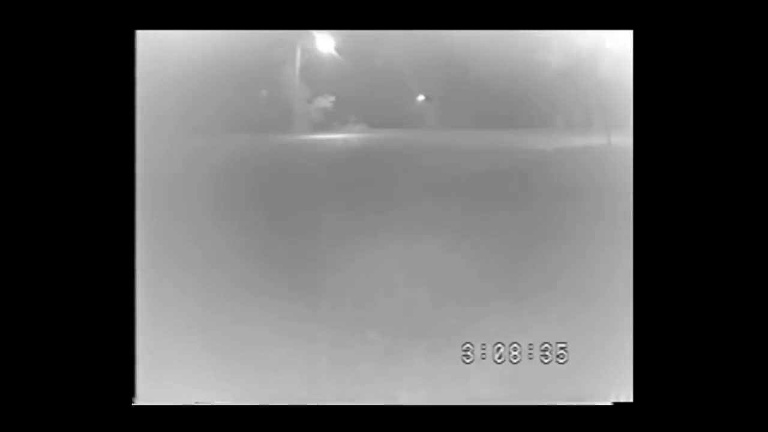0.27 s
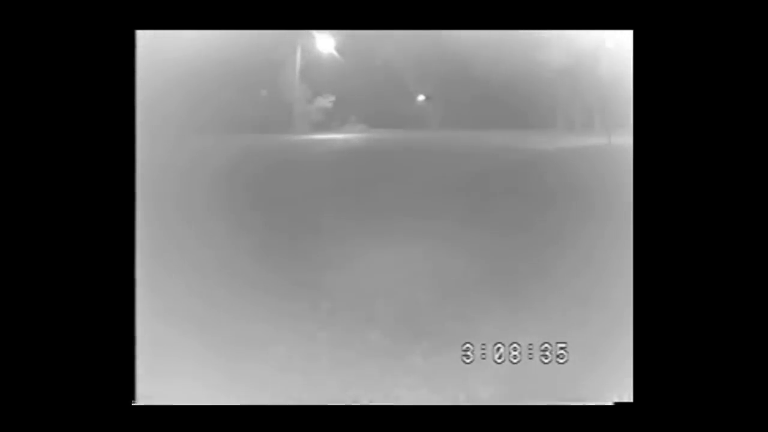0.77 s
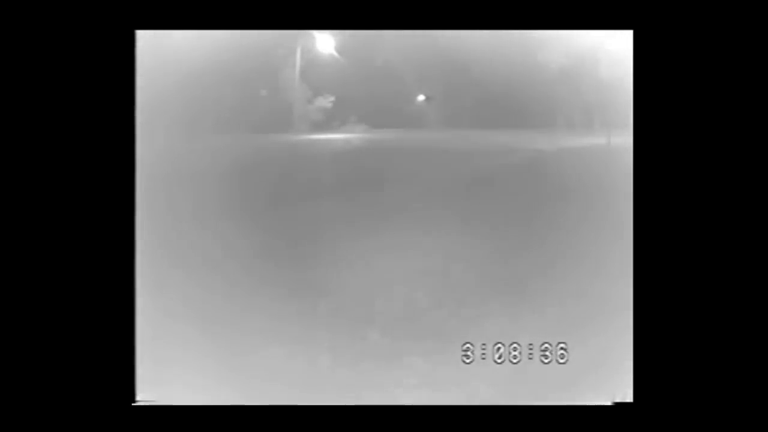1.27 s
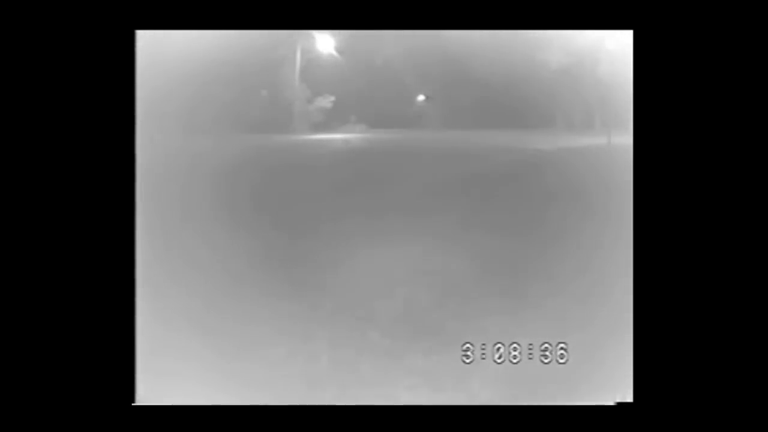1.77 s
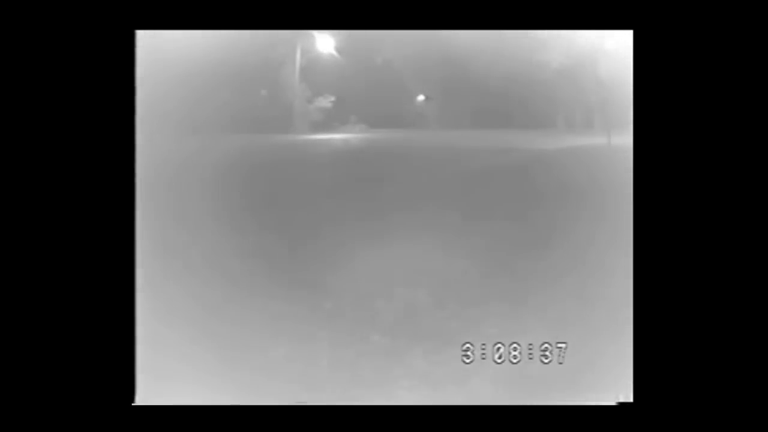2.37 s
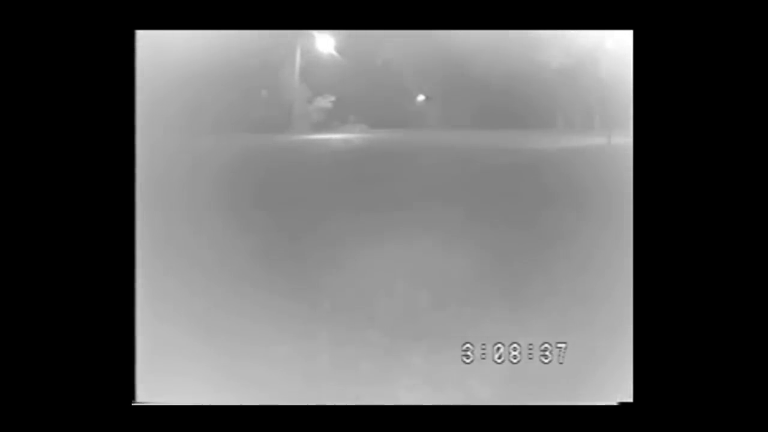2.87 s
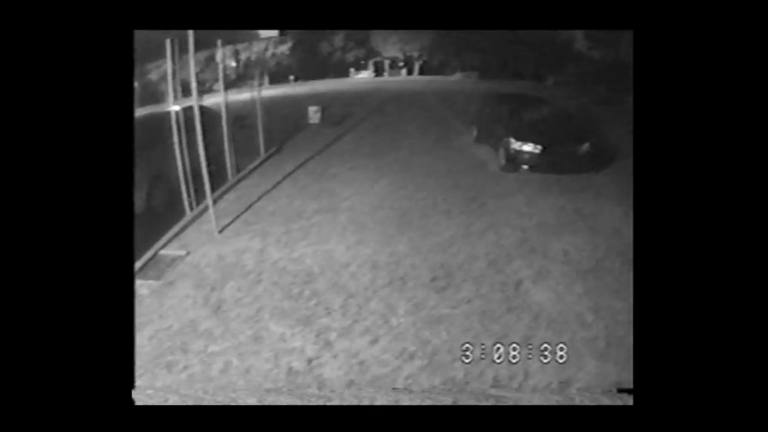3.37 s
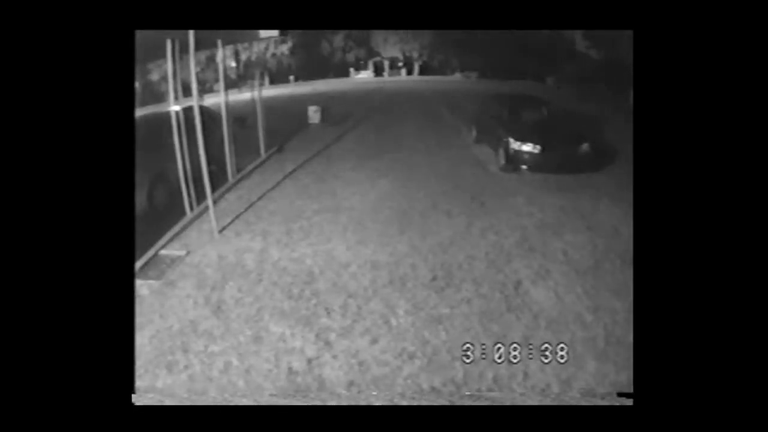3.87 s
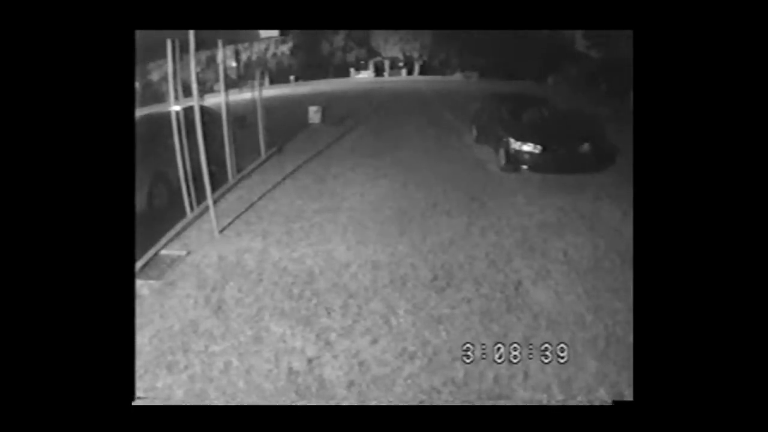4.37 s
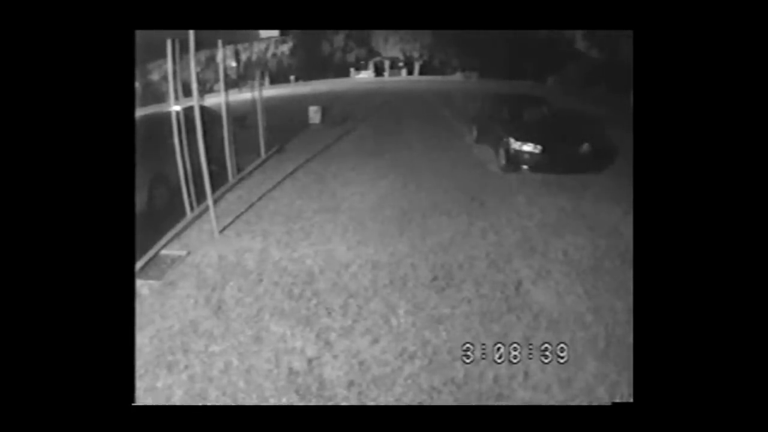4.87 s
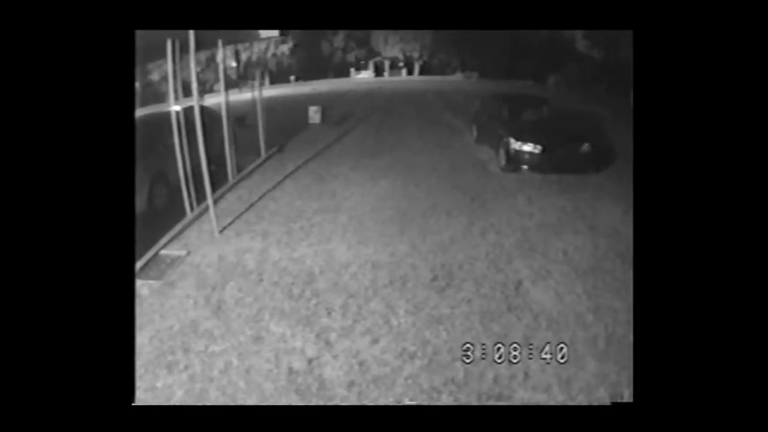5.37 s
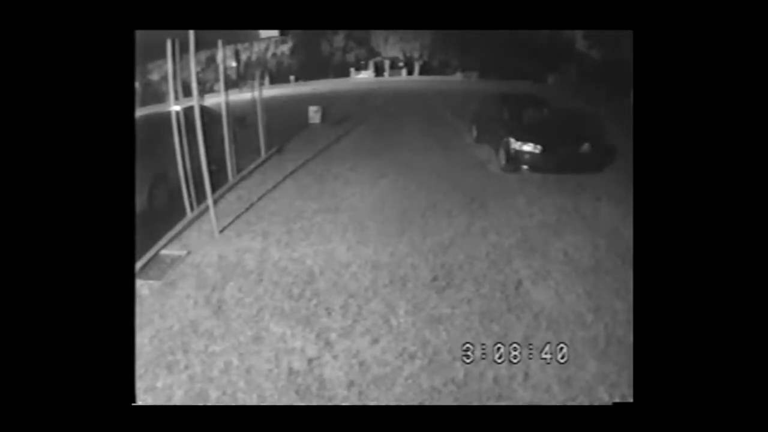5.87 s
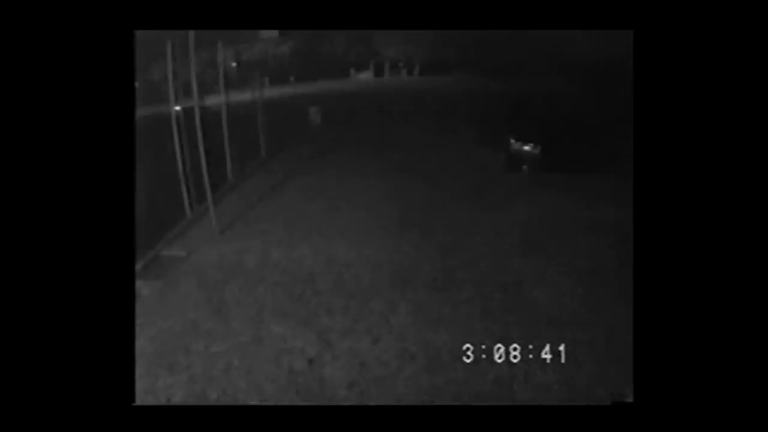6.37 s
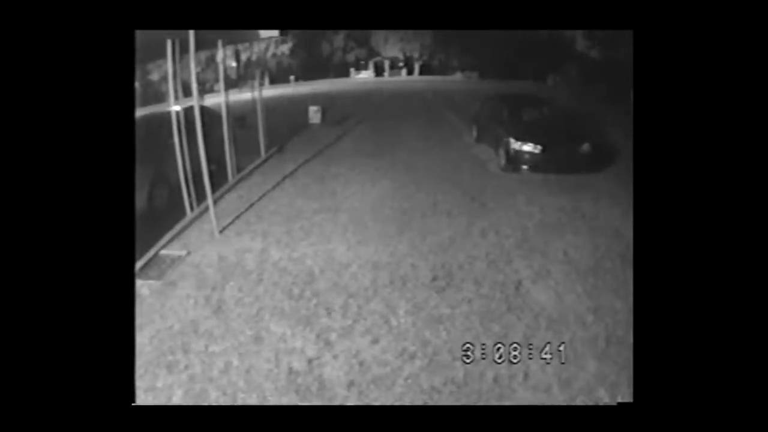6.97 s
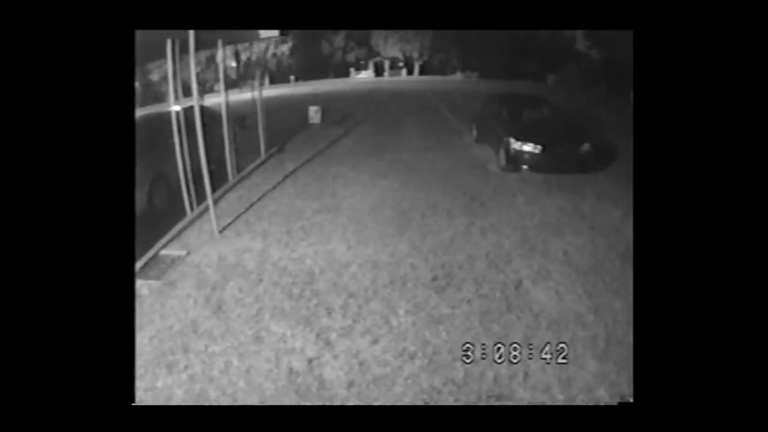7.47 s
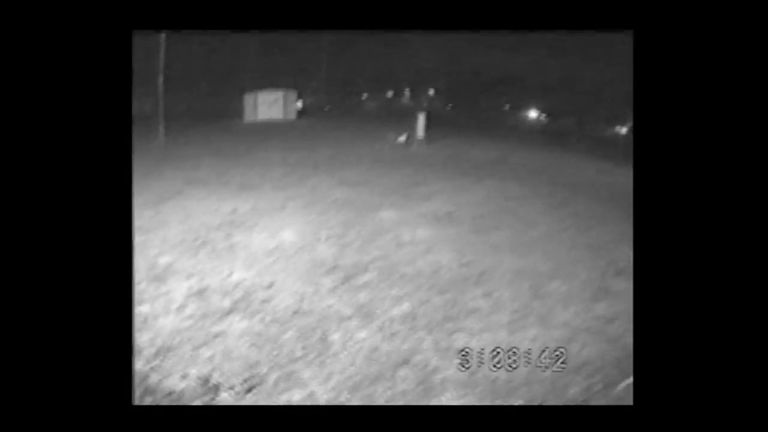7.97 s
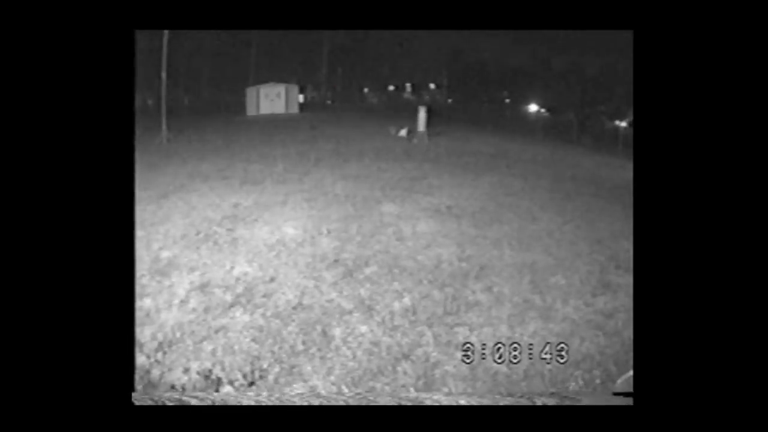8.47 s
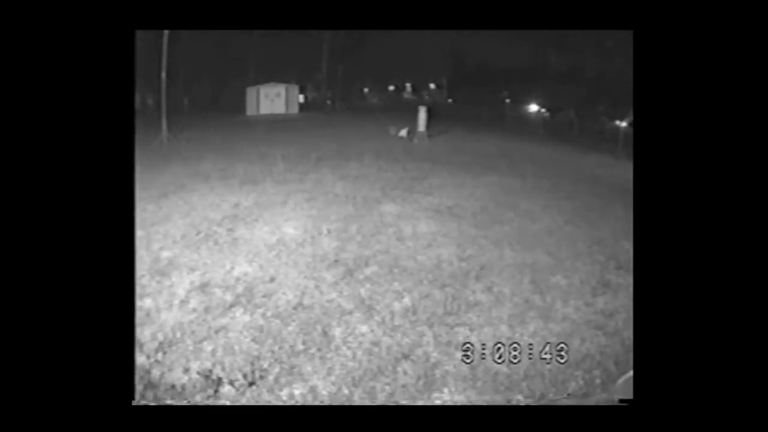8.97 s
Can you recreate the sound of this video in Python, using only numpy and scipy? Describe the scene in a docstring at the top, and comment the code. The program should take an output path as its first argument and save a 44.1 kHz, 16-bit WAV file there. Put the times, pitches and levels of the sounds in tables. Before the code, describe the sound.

Low mains hum and faint gusty air at a night camera, three sharp lightning clicks, then thunder bursts in, crackling, booming and badly distorted.

```python
"""Mains hum, a fan, a compressor and faint air at an outdoor camera at night, with one soft low thump.
Three lightning strokes snap in; under a second later thunder cracks, rolls and booms in the housing.
Hum and motors are stacked sines; air, roll and crackle are coloured noise; booms are gliding sines.
Strokes are damped swings with a reverse spike. All of it meets in one amplifier that flattens the peaks.
Tape adds hiss and grain; the left channel carries the sound and the right only a trace."""
import sys
import numpy as np
from scipy import signal
from scipy.fft import rfft, irfft, next_fast_len
from scipy.io import wavfile
from scipy.ndimage import uniform_filter1d, map_coordinates

SR = 44100
rng = np.random.default_rng(int(sys.argv[2]) if len(sys.argv) > 2 else 0)


def inscribe(sig):
    """Save sig as 16-bit PCM at rate SR to the path in sys.argv[1].

    A 1-D sig is mono; a 2-D sig holds one channel per row.
    Samples are clipped to [-1, 1] before scaling.
    """
    pcm = np.round(np.clip(np.atleast_2d(sig).T, -1, 1) * 32767)
    wavfile.write(sys.argv[1], SR, pcm.astype(np.int16))


N = 407063

# Steady tones of mains, compressor and fan. Each row: multiple of the base rate, rms level in dB.
MAINS_TONES = [(1, -29), (2, -55), (3, -64), (5, -58), (7, -55.5), (11, -75), (13, -63.5)]
COMPRESSOR_TONES = [(3, -45.5), (5, -54), (8, -45), (16, -61.5), (19, -59), (23, -59), (24, -69.5),
                    (25, -70)]
FAN_TONES = [(3, -39), (4, -47), (5, -46), (7, -61)]
MAINS_HZ, COMPRESSOR_HZ, FAN_HZ = 59.97, 59.21, 53.45
# Brief sag in tape speed that bends the hum. Each row: time in seconds, relative speed.
TAPE_SPEED = [(3.21, 1), (3.25, .979), (3.32, .978), (3.38, .989), (3.65, 1)]
# Filter on the sharp edges of the mains buzz. Each row: frequency in Hz, relative gain in dB.
BUZZ_COLOUR = [(900, -39), (1800, -0.5), (2500, -1), (4000, -3.5), (6700, 5.5), (9000, -10), (12500, -15)]
# Strength of the spikes leaking from each supply phase. Each entry: relative level in dB.
PHASE_LEAK = [0, -8, -11]

# Colours of the steady air and of the hollow housing. Each row: frequency in Hz, relative dB per Hz.
AIR_COLOUR = [(30, -25), (100, -18), (130, -18), (155, -0.5), (200, -7), (340, -13), (440, -14), (540, -3),
              (620, -9), (720, -18), (860, -20.5), (1010, -17), (1160, -24), (1250, -28), (1560, -27.5),
              (1900, -32), (2600, -33), (2920, -33), (3150, -35.5), (4000, -36.5), (12500, -46)]
HOUSING_COLOUR = [(60, -56), (120, -41), (148, 3.0), (168, 4.5), (205, -13), (240, -6.0), (280, -9.5),
                  (330, -14), (450, -44.0)]
# Gusts sounding the housing. Each row: start in seconds, hold in seconds, level in dB.
GUSTS = [(0.122, 0.23, -30.5), (0.442, 0.57, -36.5), (1.25, 0.046, -35), (1.392, 0.058, -31),
         (1.642, 0.071, -34), (1.78, 0.062, -31), (3.0, 0.037, -38), (3.288, 0.092, -37)]
CALM_DB, GUST_RISE_S, GUST_FALL_S = -54.5, 0.026, 0.067  # the draught between gusts; a gust's slopes
DRONE_HZ, DRONE_WAVER, DRONE_DB = 158.4, 0.048, 2  # pitch, unsteadiness (share), level over the housing noise

THUMP_S = 3.226

# Lightning strokes. Each row: start in seconds, kick in dB, swing pitch in Hz, reverse spike in dB,
# spike delay in seconds, spike width in seconds, static in dB.
STROKES = [(6.3752, 37, 160, 33.5, .00078, .00008, 11), (6.41493, 35, 164.5, 37.5, .0004, .00013, 4),
           (6.48138, 38, 168, 36.8, .000425, .000087, -7)]
STATIC_DECAY_S = .0009
# Small sparks before, between and after the strokes. Each row: start in seconds, hold in seconds, level in dB.
SPARKS = [(6.3738, .002, -20), (6.3912, .0012, -41), (6.517, .0006, -36)]
SPARK_RISE_S, SPARK_FALL_S = 0.00032, .0008
# Colours of the strokes' static and the sparks' spit. Each row: frequency in Hz, relative dB per Hz.
STATIC_COLOUR = [(300, -5), (1600, 8), (4000, 3.5), (13000, -5)]
SPIT_COLOUR = [(300, -2), (2500, -2), (8000, 1), (12500, -1), (15000, -22)]
# Filter on static reaching the cable. Each row: frequency in Hz, gain in dB.
CABLE_COLOUR = [(1500, 6), (6000, 3.5), (12000, 5), (15000, -22)]

# Force of the thunder: a faint forerunner, a first peal, then the main peal and its long fall.
# Each row: time in seconds, level in dB.
FORCE = [(7.17, -35), (7.2, -21), (7.226, -20), (7.234, -13), (7.258, -4), (7.35, 0.5), (7.4, -7),
         (7.48, 20), (7.66, 28), (8.1, 19), (8.48, 12.5), (8.7, 0), (8.9, 1), (9.08, 3), (9.22, -4)]
# Colours of the low roll, the crackle and the bright edge of the nearest shock fronts.
# Each row: frequency in Hz, relative dB per Hz.
ROLL_COLOUR = [(30, -17.5), (70, -18), (120, -11), (185, -2), (225, -1), (275, -1.5), (330, -4), (390, -11),
               (600, -48.5)]
CRACK_COLOUR = [(200, -18), (400, -3), (500, 1.5), (590, 1), (700, -8), (850, -5.5), (1020, -3.5),
                (1250, -13.5), (2000, -22.5), (3500, -29.5), (6000, -67)]
SNAP_COLOUR = [(600, -16.5), (950, 4.5), (1250, -0.5), (2500, -11.5), (4700, -15.5), (5600, -39)]
ROLL_DB, CRACK_DB, RUMBLE_SWAY_DB = .5, -2.5, 0.43  # levels over the force, and their sway
SNAP_FROM_S, SNAP_DB, SNAP_FADE_DB_PER_S = 7.229, -8, 12  # breaks in with the first peal, then fades
# Claps, dense volleys of shock fronts. Each row: start in seconds, hold in seconds, dB over the force.
CLAPS = [(7.175, .007, 2), (7.198, .01, 3.5), (7.232, 0.0033, 3.5), (7.246, .01, 6), (7.265, 0.004, 7),
         (7.285, 0.012, 14), (7.328, 0.013, 4.5), (7.359, .012, 7), (7.409, 0.014, 10.5), (7.434, .0077, 6),
         (7.511, 0.021, 4), (7.559, 0.011, 1), (7.668, 0.038, 3.5), (7.727, 0.0089, 0.5),
         (7.785, 0.0092, 1), (7.812, 0.0078, 3), (7.838, 0.016, 2), (7.893, 0.016, 5.5), (7.93, 0.063, 5),
         (8.045, 0.027, 6.5), (8.107, 0.017, 2.5), (8.255, 0.027, 6), (8.299, 0.019, 4), (8.373, 0.032, -2),
         (8.424, 0.059, 2.5), (8.535, .1, 2.5), (8.658, 0.052, -3), (8.716, .012, 0.5), (8.757, .01, -3),
         (8.784, 0.015, 2.5), (8.843, 0.032, 0), (8.912, 0.024, 1.5), (8.977, 0.018, -4), (9.02, 0.014, -4),
         (9.063, .047, 5.5), (9.133, 0.021, 0.5)]
CLAP_RISE, CLAP_FALL = 0.33, 0.29  # shares of the clap's hold
# Filter on single shock fronts. Each row: frequency in Hz, relative gain in dB.
FRONT_COLOUR = [(150, -14.5), (450, 0), (1000, 0.5), (2500, -12.5), (4200, -22.5), (5400, -50)]
FRONTS_PER_S, FRONT_SPREAD_DB, FRONT_DB = 250, 5, -6.5  # average rate, spread of size, level in the crackle
# Booms of the housing. Each row: start in seconds, hold in seconds, starting pitch in Hz,
# glide in Hz per second, dB over the force.
BOOMS = [(7.227, .05, 160.1, -180, 6), (7.442, 0.098, 157, -110, 6.5), (7.546, 0.062, 199.9, 100, 1),
         (7.559, 0.189, 236, -70, 1.5), (7.615, 0.047, 165, 201, 0), (7.725, .15, 147.9, 90, 4.5),
         (7.869, 0.061, 184.9, 150, -2.5), (8.022, 0.31, 157, 15, 7), (8.346, 0.191, 145, 30, 3.5),
         (8.368, 0.045, 190.3, 0, 0.5), (8.685, 0.21, 165, 45.5, 2), (8.93, 0.064, 156, 0, 0),
         (9.02, 0.16, 150.1, 100, 0)]
BOOM_RISE_S, BOOM_FALL_S = 0.0453, .04
BOOM_WAVER, BOOM_FLUTTER_DB = .04, 2.0  # unsteadiness of pitch (share) and level

# Response after the overloaded amplifier. Each row: frequency in Hz, gain in dB.
RESPONSE = [(1000, 0), (3000, -3), (5000, -6), (6300, -10), (7800, -14.5), (11500, -21.5), (14000, -57)]
# Colour of the sizzle on flattened waves. Each row: frequency in Hz, relative dB per Hz.
SIZZLE_COLOUR = [(600, 4.5), (1500, 4.5), (4000, 3), (5300, -1.0), (6300, -6), (7800, -16), (12000, -21.5),
                 (13500, -50)]
# Colours of the tape's edge-riding grain and its hiss. Each row: frequency in Hz, relative dB per Hz.
TAPE_GRAIN = [(200, -4), (1500, 2.5), (4500, 4), (6300, -27), (7800, -14), (12500, -12.5), (14200, -30)]
HISS_COLOUR = [(1000, -4), (5000, 2.5), (7500, 7.0), (12800, 2), (13800, -25)]
# Filter that picks out sharp edges for the grain. Each row: frequency in Hz, gain in dB.
EDGE_COLOUR = [(700, -62), (1500, -30), (3000, -1.0)]
TOP_HZ = 15000


def amp(db):
    """Decibels to gain."""
    return 10 ** (np.asarray(db) / 20)


def unit(x):
    """Scale to rms 1."""
    return x / np.sqrt(np.mean(x ** 2) + 1e-20)


def curves(rows):
    """One value per sample for each column after the time."""
    s, *cols = np.transpose(rows)
    return [np.interp(np.arange(N) / SR, s, c) for c in cols]


def wobble(rate):
    """A smooth random curve, rate knots a second."""
    knots = rng.standard_normal(int(N * rate / SR) + 4)
    return map_coordinates(knots, [np.arange(N) * rate / SR])


def filtered(x, response):
    """x times a response of frequency."""
    m = next_fast_len(N + SR // 2)
    return irfft(rfft(x, m) * response(np.fft.rfftfreq(m, 1 / SR)), m)[..., :N]


def coloured(x, points):
    """x through a spectrum of (Hz, dB) points on a log axis."""
    f, db = np.transpose(points)
    return filtered(x, lambda hz: amp(np.interp(np.log(hz + 1), np.log(f + 1), db)))


def noise(points):
    """Coloured noise of rms 1."""
    return unit(coloured(rng.standard_normal(N), points))


def swell(s, length, rise, fall):
    """An envelope that rises from time s, holds until s + length and dies away."""
    t = np.arange(N) / SR - s
    return np.clip(t / rise, 0, 1) * np.exp(-np.clip((t - length) / fall, 0, 50))


def burst(s, decay):
    """An envelope that jumps up at time s and dies away."""
    t = np.arange(N) / SR - s
    return (t >= 0) * np.exp(-np.clip(t / decay, 0, 50))


def tones(orders, turns, waver_db):
    """Multiples of a rotation, each wavering a little in level."""
    total = 0
    for order, db in orders:
        level = np.sqrt(2) * amp(db + waver_db * wobble(5))
        total = total + level * np.sin(2 * np.pi * (round(order) * turns + rng.random()))
    return total


def air():
    """A steady rush of noise; gusts swell at the hollow resonances of the housing and draw a note from it."""
    draught = amp(CALM_DB)
    for s, length, db in GUSTS:
        draught = draught + amp(db) * swell(s, length, GUST_RISE_S, GUST_FALL_S)
    drone_turns = DRONE_HZ * np.cumsum(1 + DRONE_WAVER * wobble(40)) / SR
    drone = np.sqrt(2) * np.sin(2 * np.pi * drone_turns)
    hollow = unit(noise(HOUSING_COLOUR) + amp(DRONE_DB) * drone)
    return amp(-38.5) * noise(AIR_COLOUR) + draught * hollow


def buzz(clock):
    """Each of the three supply phases leaks one spike per half cycle, alternating in sign."""
    edges = 0
    for k, db in enumerate(PHASE_LEAK):
        phase = MAINS_HZ * clock + k / len(PHASE_LEAK)
        edges = edges + amp(db) * np.tanh(150 * np.sin(2 * np.pi * phase))
    spikes = np.diff(edges, prepend=edges[0])
    return amp(-54.5) * unit(coloured(spikes, BUZZ_COLOUR))


def hum():
    """Mains hum with its thin buzz, and two motors turning below mains speed."""
    speed = curves(TAPE_SPEED)[0] + 0.00062 * wobble(24.97)  # tape flutter bends these tones together
    clock = np.cumsum(speed) / SR
    fan_turns = FAN_HZ * (clock + np.cumsum(0.00358 * wobble(1.987)) / SR)  # the fan also drifts
    fan = tones(FAN_TONES, fan_turns, waver_db=2.04)
    compressor = tones(COMPRESSOR_TONES, COMPRESSOR_HZ * clock, waver_db=1)
    return tones(MAINS_TONES, MAINS_HZ * clock, waver_db=0.5) + buzz(clock) + fan + compressor


def low_thump(thump_hz=8, decay=0.11, db=-19):
    """A slow, dying low swing."""
    t = np.maximum(np.arange(N) / SR - THUMP_S, 0)
    return -amp(db) * np.sin(2 * np.pi * thump_hz * t) * burst(THUMP_S, decay)


def sparks():
    """Lightning static as noise bursts about a millisecond long, and the small sparks around them."""
    strokes = sum(amp(db) * burst(s, STATIC_DECAY_S) for s, *_, db in STROKES)
    small = sum(amp(db) * swell(s, length, SPARK_RISE_S, SPARK_FALL_S) for s, length, db in SPARKS)
    return noise(STATIC_COLOUR) * strokes + noise(SPIT_COLOUR) * small


def swings(ring_decay=0.0019, after_hz=195, after_db=-24, after_decay=0.011,
           offset=0.66, settle=0.032, recover=0.055):
    """Each stroke: a hard damped swing, one reverse spike, a weak after-ring and a slowly settling offset."""
    out = np.zeros(N)
    for s, kick_db, hz, spike_db, delay, width, _ in STROKES:
        t = np.arange(N) / SR - s
        out -= amp(kick_db) * np.cos(2 * np.pi * hz * t) * burst(s, ring_decay)
        out += amp(spike_db) * np.exp(-np.minimum(((t - delay) / width) ** 2, 50))
        out -= amp(after_db) * np.cos(2 * np.pi * after_hz * t) * burst(s, after_decay)
        # the opposite slow tail balances the offset's area
        out += offset * (burst(s, settle) - settle / recover * burst(s, recover))
    return out


def booms():
    """The housing booms in spells, each on its own gliding, wavering pitch."""
    t = np.arange(N) / SR
    clock = np.cumsum(1 + BOOM_WAVER * wobble(60)) / SR
    spells = 0
    for s, length, hz, glide, db in BOOMS:
        turns = hz * clock + glide * (t - s) ** 2 / 2 + rng.random()
        spells = spells + amp(db) * swell(s, length, BOOM_RISE_S, BOOM_FALL_S) * np.sin(2 * np.pi * turns)
    return np.sqrt(2) * spells * unit(amp(BOOM_FLUTTER_DB * wobble(45)))


def fronts():
    """Single shock fronts of uneven size and either sign at random moments, rms 1."""
    arrives = rng.random(N) < FRONTS_PER_S / SR
    size = amp(FRONT_SPREAD_DB * np.clip(rng.standard_normal(N), -2, 2))
    sign = np.sign(rng.standard_normal(N))
    return unit(coloured(arrives * size * sign, FRONT_COLOUR))


def crackle():
    """A ragged crackle of shock fronts that flares in claps."""
    age = np.arange(N) / SR - SNAP_FROM_S
    # later fronts come from farther off and are duller
    snap_level = (age > 0) * amp(SNAP_DB - SNAP_FADE_DB_PER_S * np.maximum(age, 0))
    texture = amp(-1.36) * noise(CRACK_COLOUR) + snap_level * noise(SNAP_COLOUR)
    texture = texture + amp(FRONT_DB) * (age > 0) * fronts()
    clumps = unit(amp(1.88 * wobble(160)))
    claps = sum(amp(db) * swell(s, length, CLAP_RISE * length, CLAP_FALL * length)
                for s, length, db in CLAPS)
    steady = amp(CRACK_DB + RUMBLE_SWAY_DB * wobble(18))
    return np.hypot(steady, claps) * texture * clumps


def thunder():
    """One force drives a low roll, the booming housing and the crackle of shock fronts."""
    t = np.arange(N) / SR
    force = amp(curves(FORCE)[0]) * (t > FORCE[0][0])
    roll = amp(ROLL_DB + RUMBLE_SWAY_DB * wobble(18)) * noise(ROLL_COLOUR)
    return force * (roll + booms() + crackle())


def sizzle(drive, db=-35.5, growth=0.41):
    """A fine sizzle that follows the thunder's drive, growing slowly once the drive is strong."""
    strength = np.sqrt(np.abs(uniform_filter1d(drive ** 2, size=900)))
    return amp(db) * np.tanh(strength) ** 2 * strength ** growth * noise(SIZZLE_COLOUR)


def overload(x, rail=0.61, knee=7):
    """The amplifier flattens both half waves at its rails and rounds their edges."""
    fine = signal.resample_poly(x, 2, 1)  # double rate to lessen aliasing
    flattened = fine / (1 + np.abs(fine / rail) ** knee) ** (1 / knee)
    return coloured(signal.resample_poly(flattened, 1, 2), RESPONSE)


def scene():
    """Everything meets in one amplifier; a little static also reaches the cable behind it."""
    static, peal = sparks(), thunder()
    line = overload(hum() + air() + low_thump() + swings() + static + peal)
    on_cable = amp(-18) * coloured(np.tanh(static), CABLE_COLOUR)
    return (line + on_cable + sizzle(peal))[None]


def band_limit(hz):
    """The steep upper edge of the recorder's band."""
    return 1 / (1 + (hz / TOP_HZ) ** 50)


def record(dry):
    """Tape adds hiss and a grain that follows sharp edges; left holds the sound, right a trace."""
    line = dry[0]
    edges = coloured(line, EDGE_COLOUR)
    sharpness = np.sqrt(np.abs(uniform_filter1d(edges ** 2, size=110)))
    grain = amp(-12) * sharpness * noise(TAPE_GRAIN)
    hiss = amp(-60.0) * noise(HISS_COLOUR)
    left_right = amp([[0], [-52]])
    return filtered((line + grain + hiss) * left_right, band_limit)


dry = scene()
out = record(dry)
inscribe(out)
```